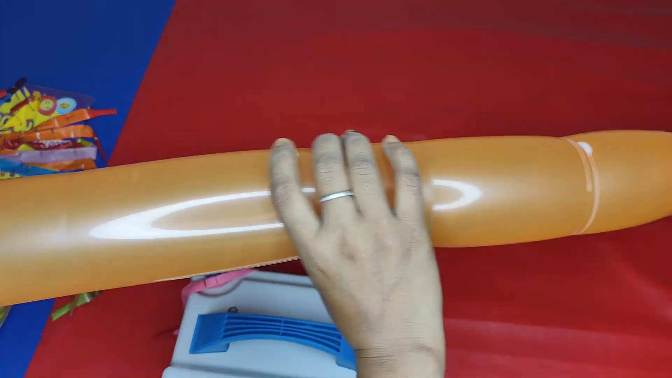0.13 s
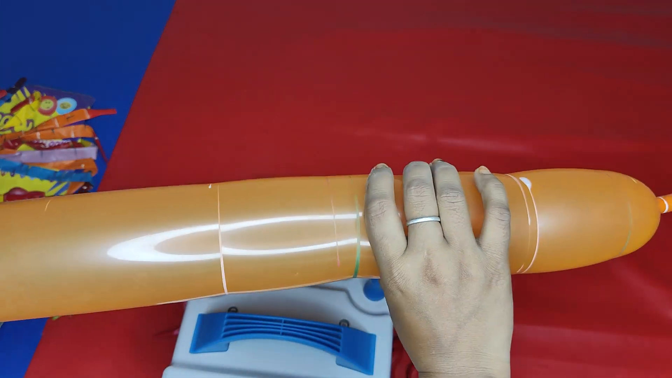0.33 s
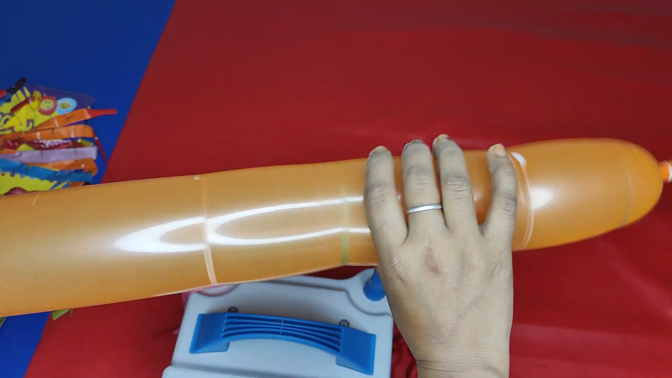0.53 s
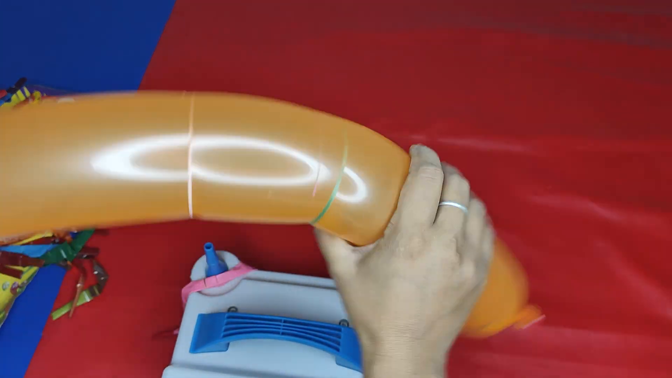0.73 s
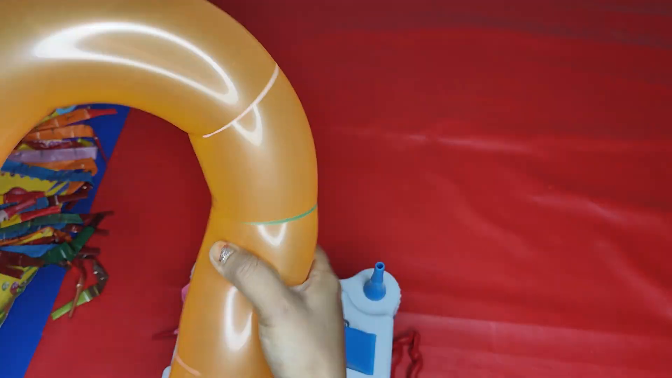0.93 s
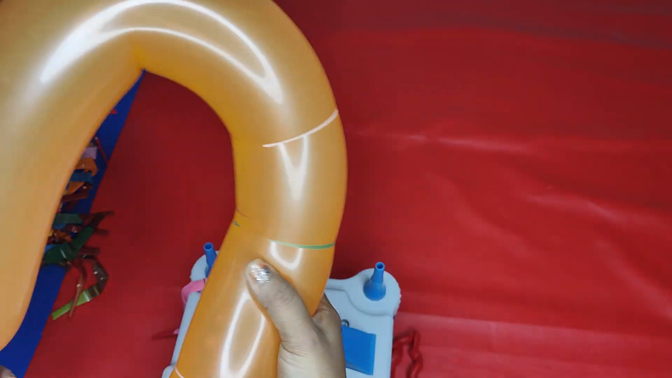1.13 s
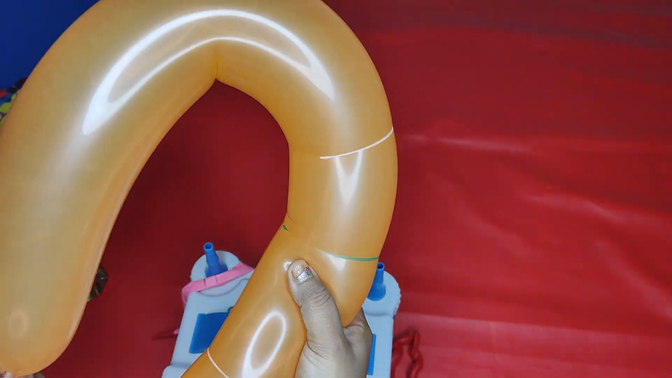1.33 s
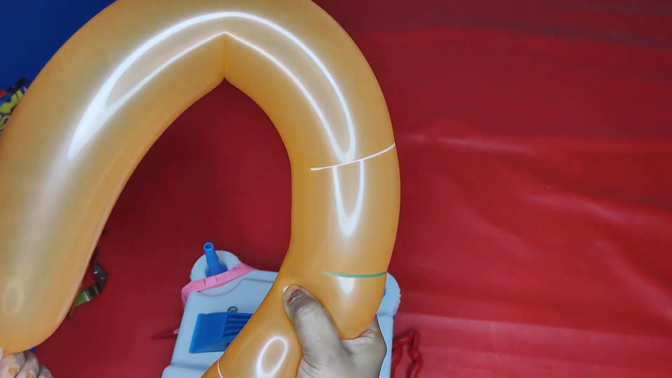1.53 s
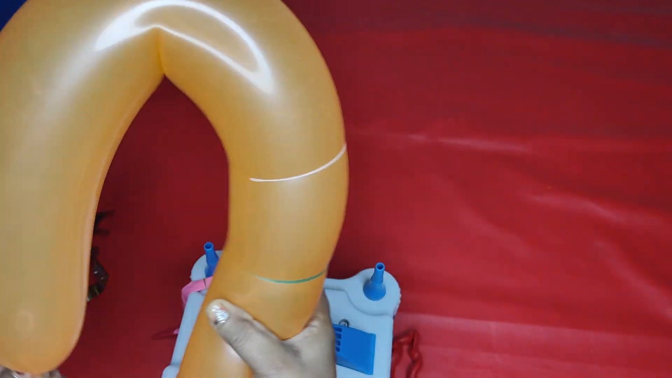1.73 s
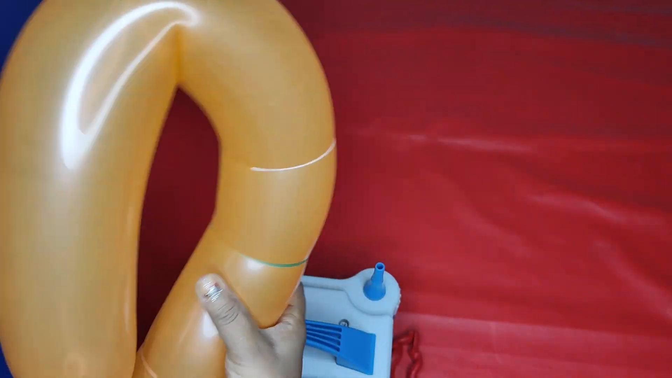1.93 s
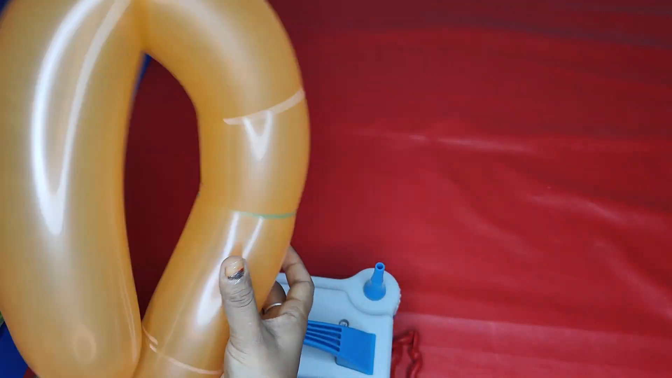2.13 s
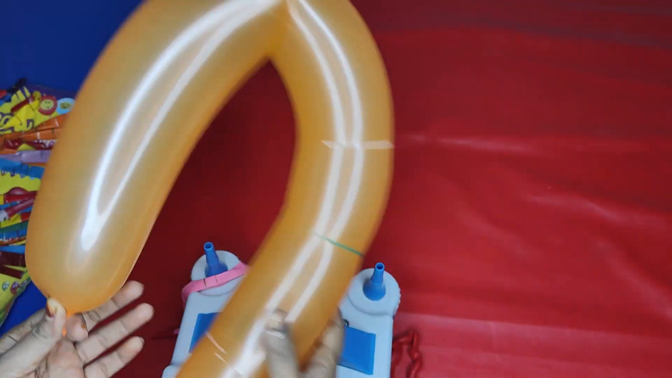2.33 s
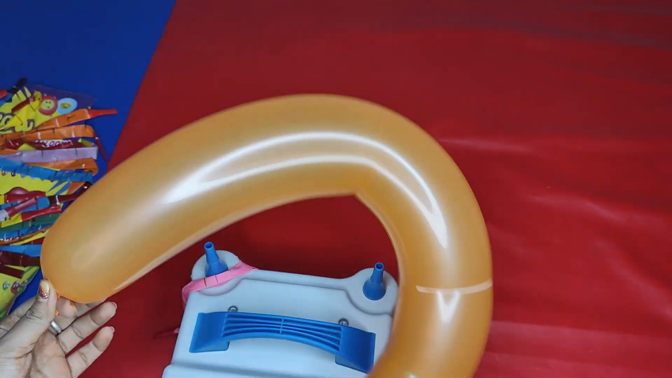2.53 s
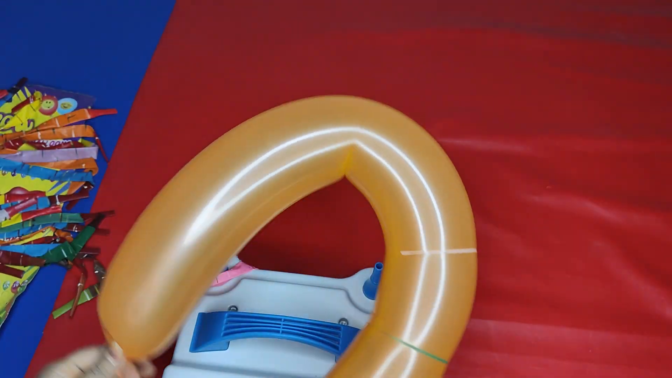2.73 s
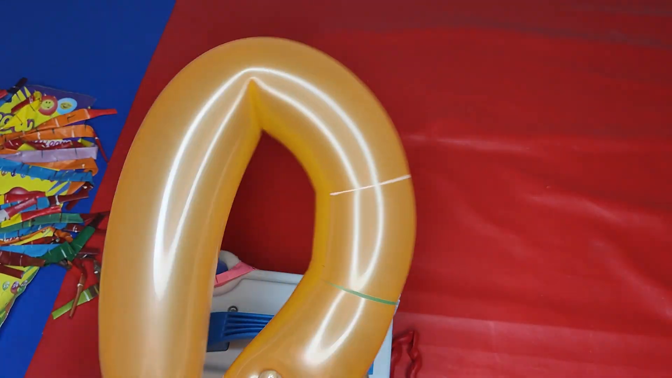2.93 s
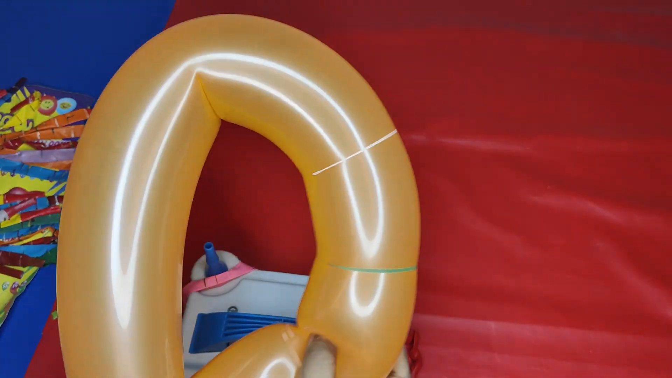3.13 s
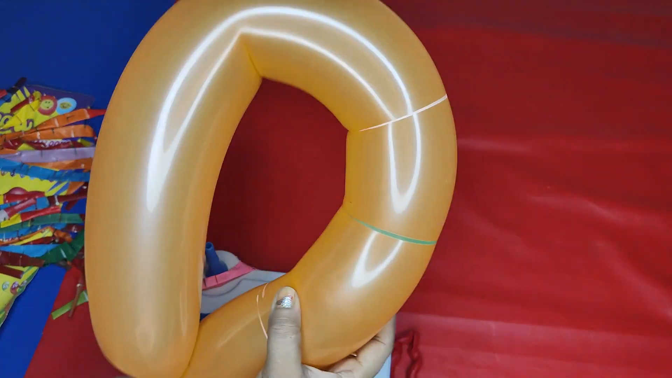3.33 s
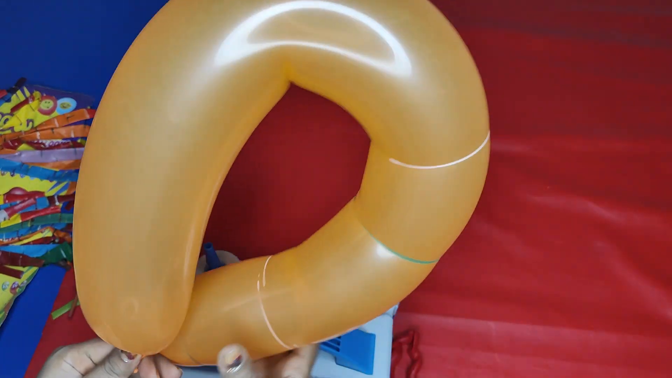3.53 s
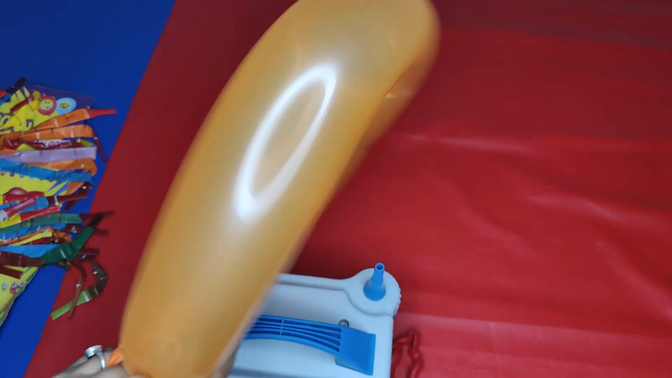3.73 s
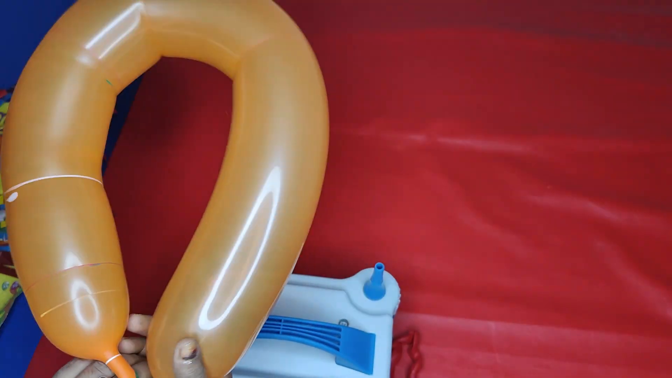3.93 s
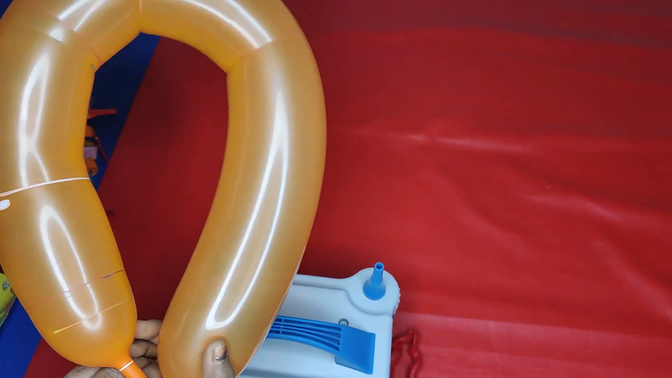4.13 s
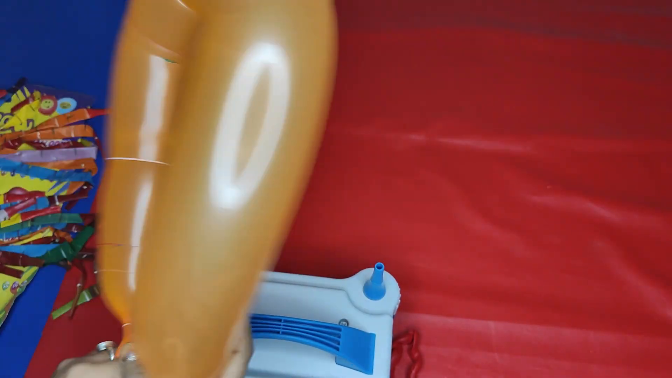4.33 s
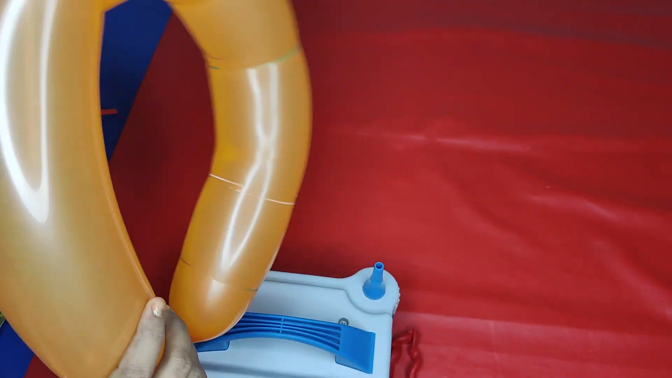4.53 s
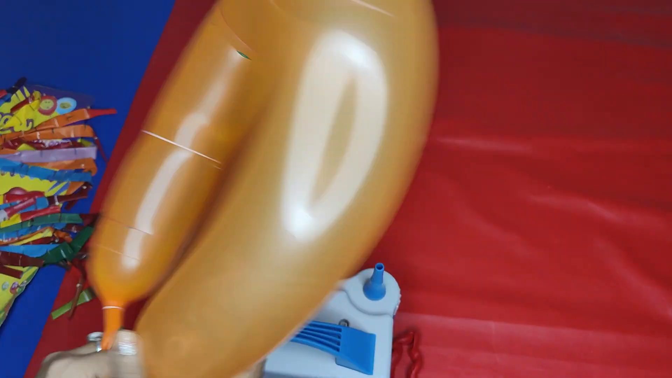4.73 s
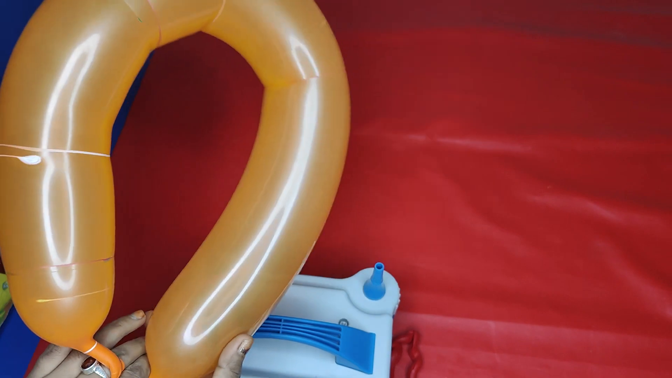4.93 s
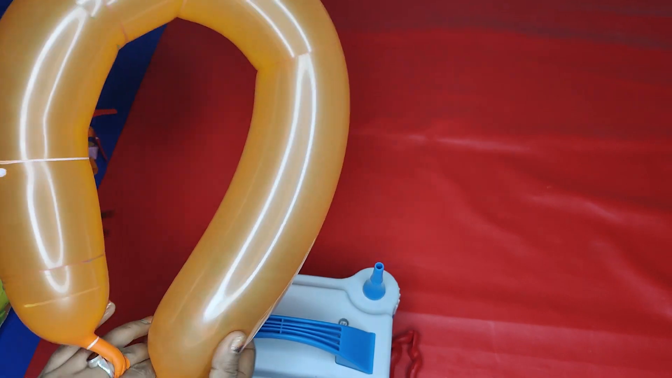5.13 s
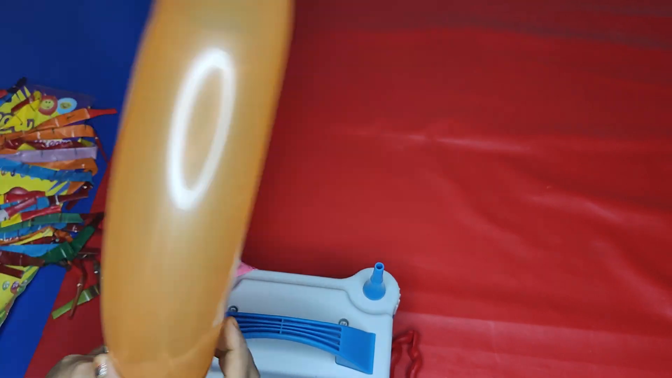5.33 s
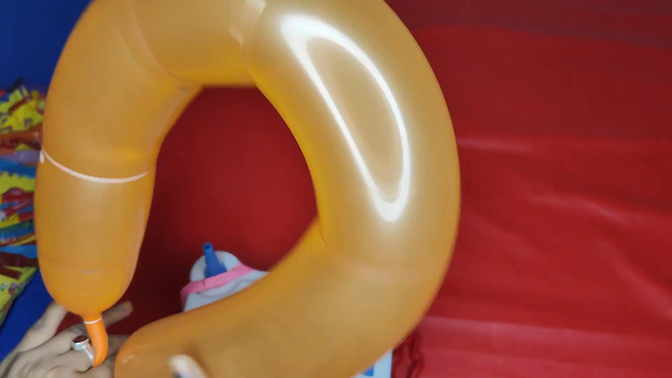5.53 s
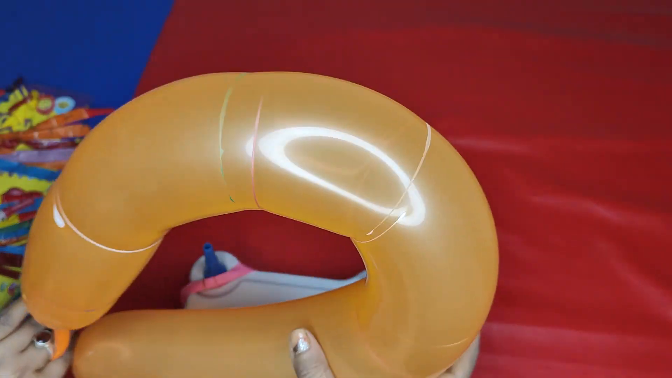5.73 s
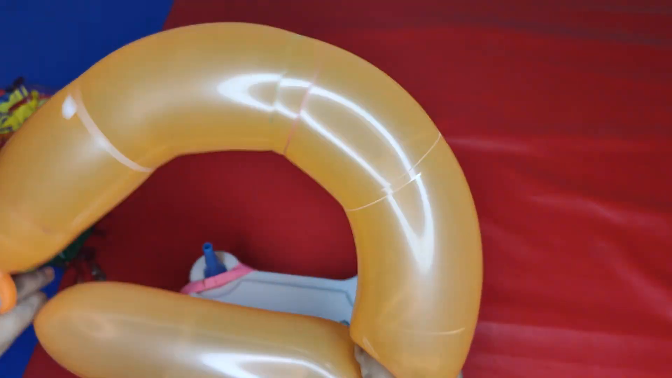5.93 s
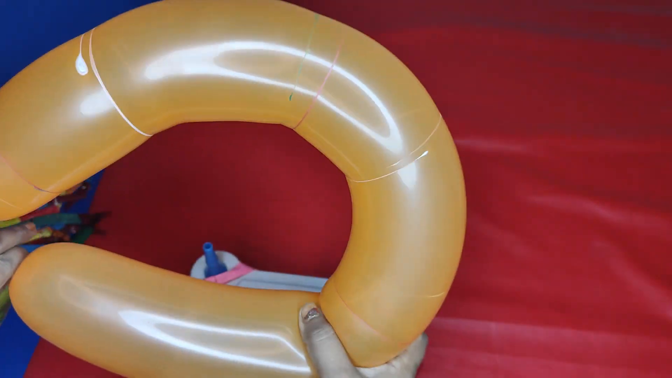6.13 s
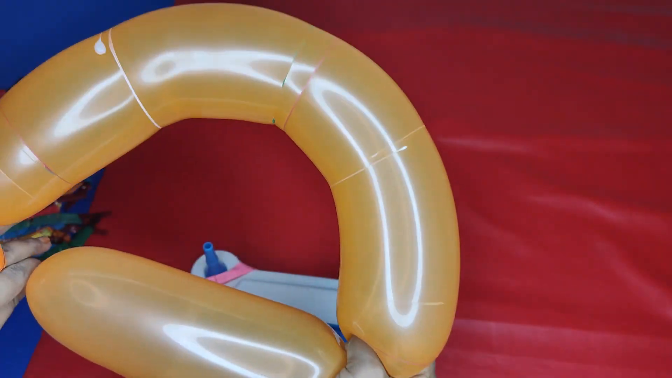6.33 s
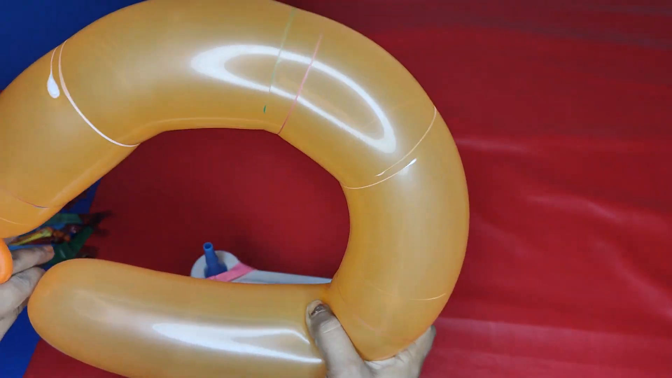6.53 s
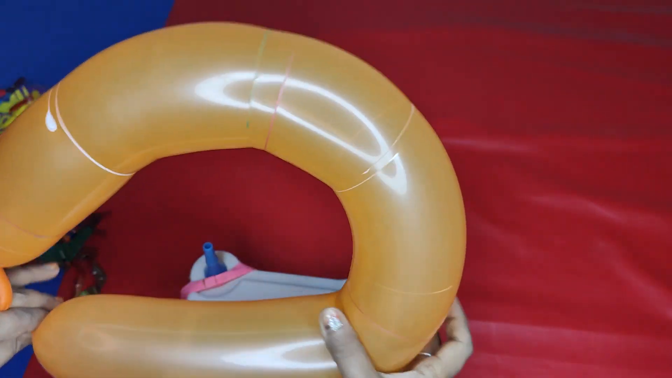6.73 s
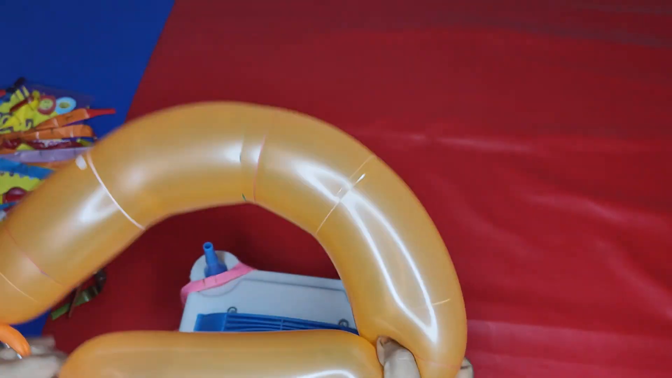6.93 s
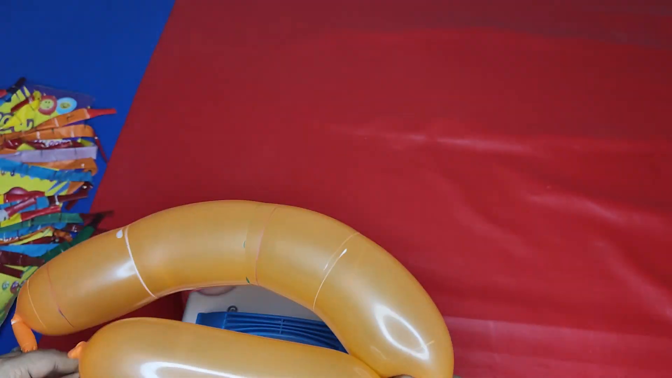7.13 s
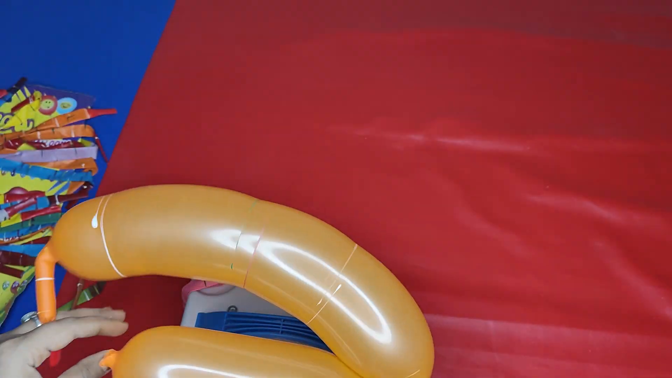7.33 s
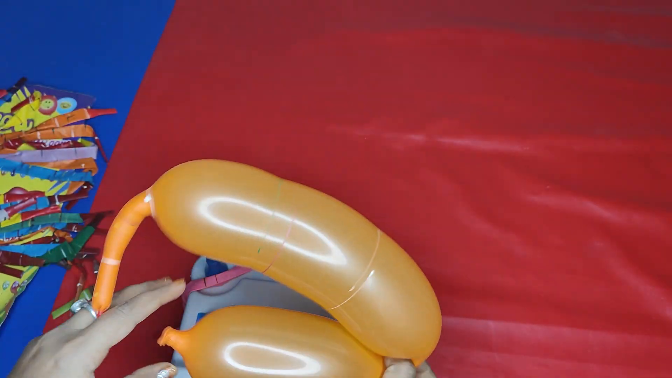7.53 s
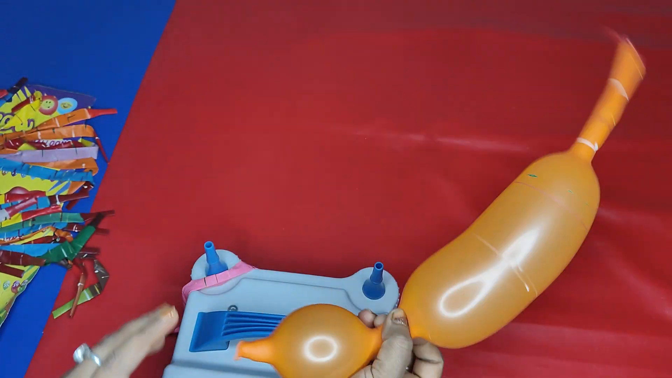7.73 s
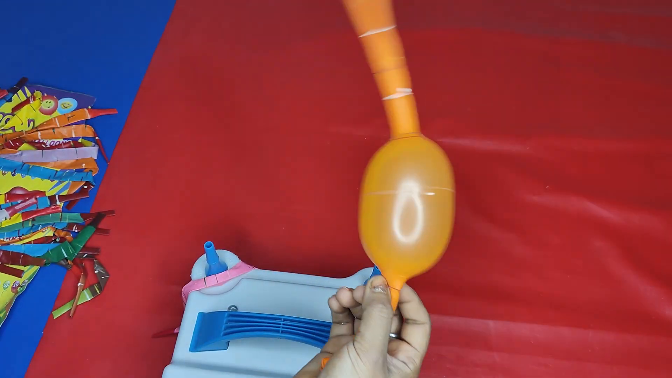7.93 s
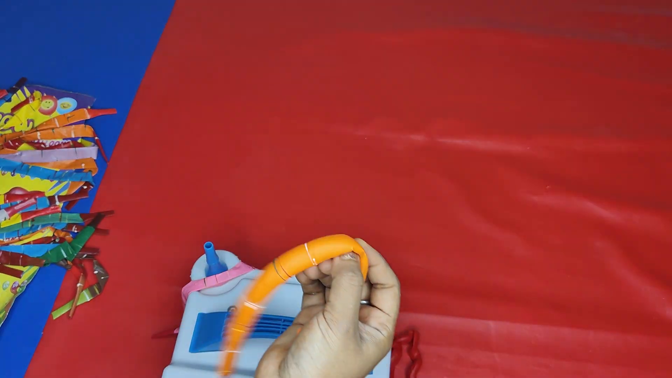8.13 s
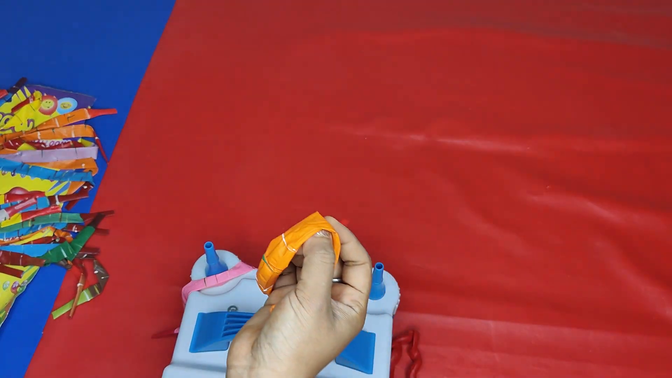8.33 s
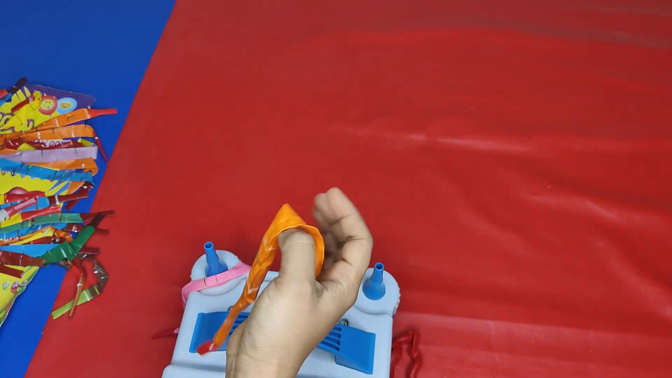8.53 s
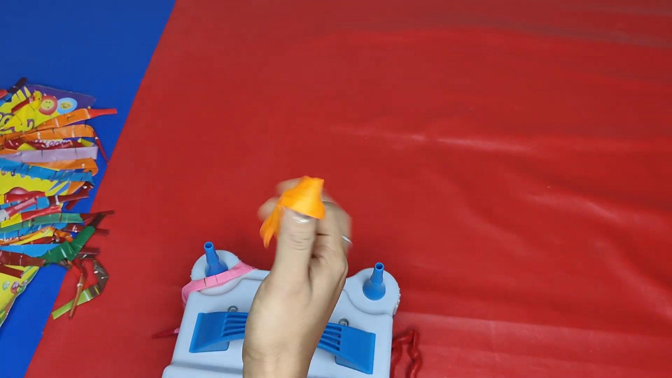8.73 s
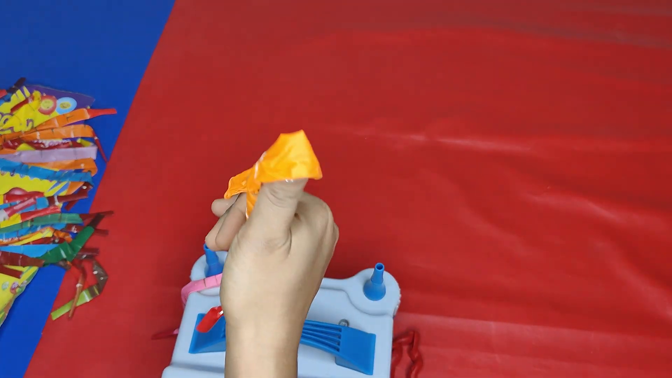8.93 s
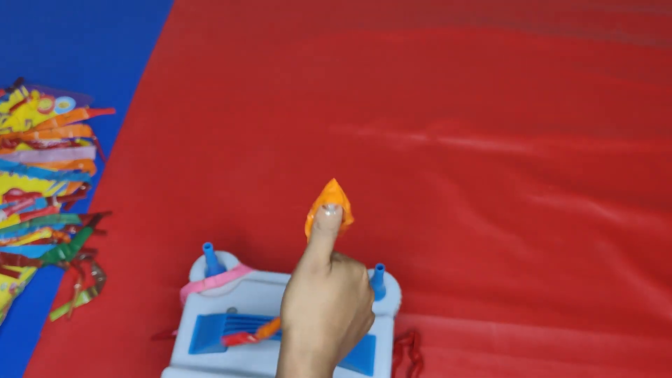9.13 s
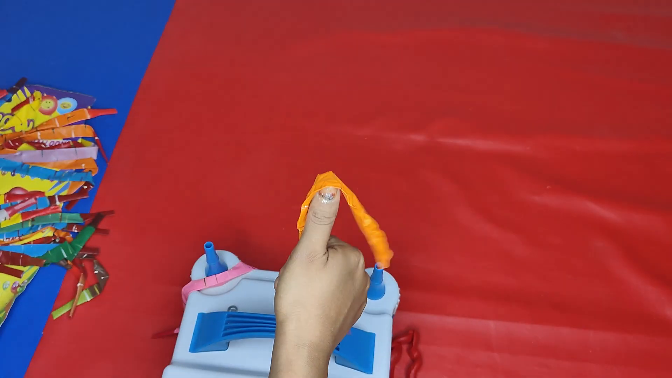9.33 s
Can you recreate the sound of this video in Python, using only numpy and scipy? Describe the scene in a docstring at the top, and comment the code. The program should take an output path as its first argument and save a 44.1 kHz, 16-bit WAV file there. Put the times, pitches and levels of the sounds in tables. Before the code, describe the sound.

A small electric pump whines down while hands creak, snap and rub a long balloon, which then gives way in a booming, fluttering rush of air.

```python
"""In a small room, an electric balloon pump coasts to a stop on a table while hands work a long balloon.
Pump: a falling sine whine with airy overtones, bearing noise and a shaft hum. Skin: stick-slip rasps ring
latex modes in two loud creaks; gliding sines chirp, dispersed clicks snap, hissing noise rubs.
The skin then gives way: sinking harmonics boom, and shaped noise and flapping puffs carry the air out
until the balloon hangs limp. A table echo, the walls' reverb and still room noise surround it all."""
import sys
import numpy as np
from scipy import signal
from scipy.fft import rfft, irfft, next_fast_len
from scipy.io import wavfile
from scipy.ndimage import map_coordinates

SR = 44100
rng = np.random.default_rng(int(sys.argv[2]) if len(sys.argv) > 2 else 0)


def file_out(sig):
    """Save sig as 16-bit WAV at sys.argv[1]."""
    # one column per channel
    cols = np.atleast_2d(sig).T
    # limit, then scale
    lim = np.clip(cols, -1, 1)
    pcm = np.round(lim * 32767).astype(np.int16)
    wavfile.write(sys.argv[1], SR, pcm)


N = 413658  # length in samples

# still room noise, relative spectrum: f/Hz, level/dB per Hz
QUIET_SPECTRUM = [(15, -46), (25, -7), (107, -13), (126, -10.5), (160, -8), (289, -15), (359, -4),
                  (433, -11.5), (1340, -15.5), (3170, -49.5), (5140, -36.5), (7100, -41.5), (15500, -49)]
# faint steady tone: f/Hz, level/dB
STEADY_TONES = [(5324, -87)]

# the fan coasts down against dry friction and air drag
FAN_START_HZ, FRICTION_HZ_PER_S, DRAG_PER_S = 2850, 405, .1
# whirr at full speed, and its loss towards standstill besides the square root of speed
WHIRR_DB, WHIRR_FALL_DB = -40.5, 26.5
# whirring bearings, relative spectrum: f/Hz, level/dB per Hz
WHIRR_SPECTRUM = [(40, -32), (110, -9.5), (190, 1.5), (380, -6.5), (600, -10), (1400, -9), (2300, -16.5),
                  (3100, -23.5), (4300, -16.5), (7000, -27.5), (10000, -26.5), (16000, -46.5)]
# housing resonances that swell the falling whine: f/Hz, width/Hz, level/dB
HOUSING_MODES = [(2235, 170, -47.5), (1920, 120, -53), (1691, 80, -48), (1330, 140, -51.5),
                 (1198, 55, -50.5)]
# swells of the shaft's hum: start t/s, fullest t/s, end t/s, level/dB
HUM_SWELLS = [(-.06, 0.248, .3, -37), (.64, 1.13, 1.48, -41)]

# fingers dragging on the skin, one list per drag: t/s, slip rate/per s, relative level/dB
FINGER_DRAGS = [
    [(.107, 125.5, -10), (.15, 118, -11), (.19, 115, -9.5), (.215, 128, -7.5), (.236, 200, -8.5),
     (.254, 163, -12)],
    [(.732, 195, -18.5), (.75, 184, -23.5), (.768, 230, -18), (.782, 260, -29)],
]
# single jerks of the skin: t/s, relative level/dB, pitch factor
SKIN_JERKS = [(.045, -16.5, 1), (.055, -23, 0.84), (.082, -16.5, 0.93), (.091, -15.5, 0.82),
              (.098, -19, 0.95), (.646, -29, 0.84), (.672, -29, .85), (.679, -7.5, 0.95),
              (.6855, -13, 0.93), (.692, -14, 0.79), (.702, -11, 0.9), (.728, -10, 0.85)]
# modes of the stretched latex at pitch factor 1: f/Hz, width/Hz, relative level/dB
SKIN_MODES = [(796, 157, -15), (1596, 360, -1.5), (2254, 228, 1.5), (2585, 180, -6), (5827, 400, -14.5),
              (8900, 800, -12.5)]
# slipping skin, relative spectrum: f/Hz, level/dB per Hz
RASP_SPECTRUM = [(40, -32), (110, -11), (220, -3.5), (420, -6.5), (650, -10), (1000, -0.5), (2400, -3),
                 (3200, -2), (5500, -6), (9500, -8.5), (15500, -19)]
# hoarse chirps of catching fingers: t/s, length/s, start f/Hz, end f/Hz, level/dB
SKIN_CHIRPS = [(.122, .17, 698, 1051, -36), (.679, 0.031, 601, 573, -24), (.735, .035, 518, 556, -34),
               (2.798, .14, 1740, 2240, -51), (3.198, 0.069, 678, 496, -49),
               (3.206, 0.057, 1007, 1124, -50.5), (3.58, 0.043, 620, 523, -49),
               (3.688, 0.038, 1204, 1120, -45), (3.788, 0.042, 2227, 2105, -47),
               (5.772, 0.085, 1247, 957, -55), (6.192, 0.038, 1003, 758, -53), (8.171, .1, 491.7, 587, -50),
               (8.243, 0.035, 2350, 2582, -29.5)]
# soft bumps of the balloon: t/s, level/dB, nominal f/Hz before the glide, length/s
SOFT_BUMPS = [(.70, -32, 205, 0.088), (0.744, -38, 59.4, 0.071), (3.9, -50, 81, 0.042),
              (3.952, -42.5, 58, 0.053), (4.852, -54, 90, 0.06), (4.984, -50, 141, 0.033),
              (5.56, -50, 180, .04), (5.603, -46.5, 60, 0.1), (7.135, -26.5, 366, 0.028)]

# flicks and snaps of the skin, and the pop of an air spurt at 7.94 s, relative levels:
# t/s, pop level/dB, edge level/dB, thump level/dB
SNAPS_AND_POP = [(1.1908, -28, -22, -49), (1.8943, -7, -18.5, -45), (2.649, -26, -30, -48),
                 (2.982, -24.5, -32, -19), (3.102, -17.5, -28.5, -18), (3.345, -17.5, -20.5, -40),
                 (3.551, -1, -20.5, -18), (4.008, -28, -26, -35), (4.843, -19.5, -22.5, -22.5),
                 (5.522, -28, -34.5, -16.5), (5.555, -40, -55, -18), (6.0149, -21.5, -14.5, -54),
                 (6.1525, -36.5, -31, -47), (6.177, -28, -20.5, -40), (6.5235, -36.5, -32.5, -58),
                 (6.5473, -21.5, -20, -41), (6.7127, -6, -13, -25), (6.8382, -15, -26, -16),
                 (6.8615, -12, -24.5, -21.5), (6.944, -22, -33, -27), (6.9783, -21, -29, -29),
                 (7.112, -7.5, -11, -27), (7.94, -20, -17, -18.5), (8.867, -54, -41, -58)]
# dull pop of a snap, relative spectrum: f/Hz, level/dB per Hz
POP_SPECTRUM = [(50, -16.5), (150, -6.5), (380, 6), (750, -0.5), (1300, 5), (2400, 4.5), (3200, -7.5),
                (6000, -15), (15000, -60)]
# sharp edge of a snap, relative spectrum: f/Hz, level/dB per Hz
EDGE_SPECTRUM = [(500, -49.5), (2500, -7.5), (4000, 3.5), (6500, 3.5), (10000, -8), (15500, -22.5)]
# thump of the air inside, relative spectrum: f/Hz, level/dB per Hz
THUMP_SPECTRUM = [(40, -6.5), (130, -4), (380, 2), (600, -9), (1200, -16), (4000, -48)]

# hands sliding on the skin, and a brief hiss of leaking air at 6.989 s:
# start t/s, length/s, hiss level/dB, drone level over the hiss/dB
STROKES_AND_LEAK = [(2.08, 0.41, -56, -5), (2.765, .19, -56.5, -7.5), (3.026, .12, -57, 2),
                    (3.158, .23, -49.5, -7.5), (3.386, .125, -50, -15), (3.548, .22, -52, -1),
                    (3.725, .23, -52, -3.5), (3.979, .04, -53.5, 1), (4.41, .23, -68.5, -1.5),
                    (4.824, .13, -55.5, -1), (4.924, .12, -58.5, -12), (5.296, .21, -69, -8),
                    (5.526, 0.38, -48.5, -9), (5.89, .13, -60.5, -6), (5.996, .09, -53, -7.5),
                    (6.154, .06, -51, -7.5), (6.308, .13, -63.5, -2), (6.499, .08, -59.5, -1),
                    (6.989, .06, -54.5, -15), (8.855, .08, -67.5, -17), (9.261, .11, -72, -17.5)]
STROKE_PEAK = 0.53  # share of its length at which each row is loudest
# dry rubbing and leak, relative spectrum: f/Hz, level/dB per Hz
HISS_SPECTRUM = [(800, -5), (2500, -3.5), (4000, -6.5), (6000, -0.5), (9000, -0.5), (12000, -7.5),
                 (15500, -19.5)]
# droning skin, relative spectrum: f/Hz, level/dB per Hz
DRONE_SPECTRUM = [(60, 4), (160, -14), (380, 0), (700, -2), (1200, 1), (2300, -2), (3100, -31),
                  (6000, -35.5)]

# the air's way out: it opens, narrows to the neck, and the balloon is empty
OPEN_S, NARROW_S, EMPTY_S = 7.045, 7.94, 8.27
# open jet; jet and neck resonance once it has narrowed
JET_DB, NARROW_JET_DB, NECK_DB = -38.5, -45, -35
# spurts break off as a pocket of air gets through: peak t/s, jet level/dB, flap level/dB, neck level/dB
AIR_SPURTS = [(7.142, -23.5, -30.5, -21.5), (7.942, -32, -47, -37.5), (8.071, -46, -50.5, -35),
              (8.266, -40.5, -42.5, -36)]
SPURT_RISE_S, SPURT_FALL_S = 0.027, .01  # time constants
# jet of air, relative spectrum: f/Hz, level/dB per Hz
JET_SPECTRUM = [(300, -25), (1500, -25.5), (3000, -4), (4800, -1), (8000, 1), (10500, 0.5), (12500, -3.5),
                (15500, -11.5)]
# flapping tube, relative spectrum: f/Hz, level/dB per Hz
FLAP_SPECTRUM = [(90, -17.5), (250, -4), (550, -3.5), (1000, -1), (1400, -1), (2300, -0.5), (3200, -11.5),
                 (7000, -34)]
# resonances of the narrow neck: f/Hz, width/Hz, relative level/dB
NECK_MODES = [(598, 85, -19.5), (1310, 250, -13.5), (2140, 260, 0.5), (2600, 310, 0.5), (4000, 1200, -6.5),
              (6560, 1800, -9.5), (8200, 980, -16.5)]

# the air column booms as the skin gives way, and its pitch sinks with the pressure
BOOM_S, BOOM_ATTACK_S, BOOM_HOLD_S, BOOM_RELEASE_S = 7.125, 0.029, 0.17, 0.057
BOOM_START_HZ, BOOM_END_HZ, BOOM_SINK_S = 123, 88.6, .11
BOOM_DB, BOOM_FADE_DB_PER_S = -32.5, 32
# harmonics of the boom: multiple of the fundamental, relative level/dB
BOOM_HARMONICS = [(1, -6), (2, -17), (3, -17), (4, -7.5), (5, -15.5)]

# the tube collapses: start, fullest flutter, heaviest flaps, end
SLACK_S, FLUTTER_S, HEAVY_S, LIMP_S = 7.48, 7.63, 7.79, 7.91
# nominal flap rate and resonances, each from start to end of the collapse
FLAPS_PER_S, MOUTH_HZ, POCKET_HZ = (135, 50), (1130, 895), (350, 224)
# the loudest flaps: t/s, relative level/dB
LOUD_FLAPS = [(7.689, -24), (7.756, -24), (7.783, -24.5), (7.791, -22), (7.808, -22.5), (7.844, -26.5)]

# decay of the room: f/Hz, time to fall 60 dB/s
ROOM_DECAY = [(100, 0.5), (500, .65), (2000, 0.5), (6000, 0.44), (10000, .48), (16000, 0.23)]
# likeness of diffuse sound at the two ports: f/Hz, likeness (0 to 1)
PORT_LIKENESS = [(30, 0.9), (100, 0.2), (280, 1), (550, 0.034), (1000, 0.074), (2000, .05), (4000, 0.0099)]
# colour of the left microphone port: f/Hz, level/dB
LEFT_COLOUR = [(100, 3), (700, 2.5), (2200, 2.5), (3200, 1.5), (4400, 7.5), (5300, 6.5), (6150, 14),
               (7000, -1.5), (8200, -21), (9500, -11), (11000, -4.5), (15000, 0.5)]
# colour of the right microphone port: f/Hz, level/dB
RIGHT_COLOUR = [(100, 2), (700, 1.5), (2200, 0.5), (3200, -0.5), (4400, 1), (5500, -5), (7000, -7.5),
                (8100, 6), (9500, 3), (11000, 1), (15000, 0.5)]
TOP_HZ = 15850  # nothing passes above this


def amp(db):
    """Decibels to amplitude."""
    return 10 ** (np.asarray(db) / 20)


def unit(x):
    """Scale to rms 1."""
    return x / np.sqrt(np.mean(x ** 2) + 1e-20)


def along(points, hz):
    """Read (f/Hz, value) points on a log frequency axis."""
    f, v = np.transpose(points)
    return np.interp(np.log(hz + 1), np.log(f), v)


def curves(rows):
    """One value per sample for each column after the time."""
    s, *cols = np.transpose(rows)
    return [np.interp(np.arange(N) / SR, s, c) for c in cols]


def wobble(rate):
    """A smooth random curve, rate knots a second."""
    knots = rng.standard_normal(int(N * rate / SR) + 4)
    return map_coordinates(knots, [np.arange(N) * rate / SR])


def swell(start, peak, end):
    """A rounded rise from 0 to 1 and back (times in s)."""
    return np.sin(np.pi / 2 * np.interp(np.arange(N) / SR, [start, peak, end], [0, 1, 0]))


def held(start, end, attack, release):
    """Rise from start, hold 1 until end, then release (all in s)."""
    t = np.arange(N) / SR
    return np.clip((t - start) / attack, 0, 1) * np.clip(1 - (t - end) / release, 0, 1)


def filtered(x, response):
    """x times a complex response of frequency, zero-padded against wrap-around."""
    m = next_fast_len(N + SR // 2)
    return irfft(rfft(x, m) * response(np.fft.rfftfreq(m, 1 / SR)), m)[..., :N]


def coloured(x, points):
    """x through a causal minimum-phase filter with the given (f/Hz, level/dB) gain."""
    size = 4096
    cepstrum = irfft(np.log(amp(along(points, np.fft.rfftfreq(size, 1 / SR)))))
    # fold the cepstrum forward in time
    cepstrum[1:size // 2] *= 2
    cepstrum[size // 2 + 1:] = 0
    impulse = irfft(np.exp(rfft(cepstrum)))
    return signal.oaconvolve(x, impulse)[:N]


def shaped(x, points):
    """As coloured, but white noise keeps its power."""
    gain = amp(along(points, np.fft.rfftfreq(2 ** 12, 1 / SR)))
    return coloured(x, points) / np.sqrt(np.mean(gain ** 2))


def noise(points):
    """Noise of rms about 1 with the given spectrum."""
    return shaped(rng.standard_normal(N), points)


def add(track, s, sound):
    """Mix a sound into a track at time s."""
    part = track[max(round(s * SR), 0):][:len(sound)]
    part += sound[:len(part)]


def burst(life):
    """A puff of noise that rises quickly and dies within a few lives (s)."""
    u = np.arange(SR // 25) / SR / life
    puff = rng.standard_normal(len(u)) * np.sqrt(u) * np.exp(-u)
    return puff / np.linalg.norm(puff) * np.sqrt(life * SR)


def click(spread, grit):
    """A click smeared in time, treble first (spread: delay at 1 kHz in s), with some grit."""
    size = 2048
    khz = np.fft.rfftfreq(size, 1 / SR) / 10 ** 3
    # delay falls with the square root of frequency
    clean = irfft(np.exp(-4j * np.pi * spread * 10 ** 3 * np.sqrt(khz)))[:size // 2]
    rough = burst(.0016)[:size // 2]
    return clean + grit * rough / np.linalg.norm(rough)


def diffuse(pair):
    """Blend two unrelated signals so that they are as alike at each frequency as at two close ports."""
    def response(hz):
        angle = np.arccos(np.clip(along(PORT_LIKENESS, hz), -1, 1)) / 2
        return np.array([np.cos(angle), np.sin(angle)])

    mid, side = filtered(pair, response)
    return np.array([mid + side, mid - side])


def background():
    """Still room noise, diffuse at the two ports, with a faint steady sine."""
    t = np.arange(N) / SR
    tones = sum(amp(db) * np.sin(2 * np.pi * hz * t) for hz, db in STEADY_TONES)
    hush = diffuse(np.array([noise(QUIET_SPECTRUM), noise(QUIET_SPECTRUM)]))
    return amp(-64.5) * hush + tones


def pump(blades=24, blur_hz=2.5, air_blur_hz=130):
    """The coasting motor: shaft hum, a falling fan whine with airy overtones, and whirring bearings."""
    t = np.arange(N) / SR
    brake_hz = FRICTION_HZ_PER_S / DRAG_PER_S
    whine_hz = np.maximum((FAN_START_HZ + brake_hz) * np.exp(-DRAG_PER_S * t) - brake_hz, 0)
    speed = whine_hz / FAN_START_HZ
    whine_phase = 2 * np.pi * np.cumsum(whine_hz) / SR
    shaft = np.sin(whine_phase / blades)

    def stray(hz, rate):
        """Random drift of phase that blurs a tone."""
        return 2 * np.pi * np.cumsum(hz * wobble(rate)) / SR

    housing = sum(amp(db) / (1 + (2 * (whine_hz - hz) / width) ** 2) for hz, width, db in HOUSING_MODES)
    whine = housing * amp(.7 * wobble(30)) * np.sin(whine_phase + stray(blur_hz, 120))
    airy = sum(amp(db) * np.sin(order * whine_phase + stray(air_blur_hz, 900))
               for order, db in [(2, -11.5), (3, -16), (5, -24)])
    bearings = noise(WHIRR_SPECTRUM) * (1 + 0.38 * shaft)  # pulsing once a turn
    whirr_level = amp(WHIRR_DB - WHIRR_FALL_DB * (1 - speed)) * np.sqrt(speed)
    hum_level = sum(amp(db) * swell(start, fullest, end) for start, fullest, end, db in HUM_SWELLS)
    return whine + whirr_level * (bearings + airy), hum_level * shaft


def creaks(slip_time=0.0088, ring_db=11.0, rasp_db=-9, rise=0.0016, jitter=.02):
    """Skin sticks and slips under the fingers; each slip rasps briefly and rings the stretched latex."""
    slips = list(SKIN_JERKS)
    for drag in FINGER_DRAGS:
        rate, db = curves(drag)
        at = drag[0][0]
        while at < drag[-1][0]:
            now = int(at * SR)
            slips.append((at, db[now], 1))
            at += (1 + jitter * rng.normal()) / rate[now]
    ring, rasp = np.zeros(N), np.zeros(N)
    t = np.arange(SR // 25) / SR
    sliding = np.sqrt(np.clip(1 - t / slip_time, 0, 1))
    for s, db, pitch in slips:
        tension = pitch * (1 + 0.026 * rng.normal())
        modes = np.zeros(len(t))
        for hz, width, level in SKIN_MODES:
            decay = amp(level + rng.normal()) * np.exp(-np.pi * width * t)
            modes += decay * np.sin(2 * np.pi * (hz * tension * t + rng.random()))
        add(ring, s, amp(db + ring_db) * modes * (1 - np.exp(-t / rise)))
        add(rasp, s, amp(db + rasp_db) * sliding * rng.standard_normal(len(t)))
    return ring + shaped(rasp, RASP_SPECTRUM)


def chirps(hoarse=.11):
    """Fingers catch on the latex: uneven slips excite one gliding resonance, a roughened sine."""
    out, waver, grain = np.zeros(N), wobble(500), amp(3.8 * wobble(250))
    for s, length, start_hz, end_hz, db in SKIN_CHIRPS:
        u = np.linspace(0, 1, int(length * SR))
        glide_hz = start_hz + (end_hz - start_hz) * u
        hz = glide_hz * (1 + hoarse * waver[int(s * SR):][:len(u)])
        add(out, s, amp(db) * np.sin(np.pi * u) * np.sin(2 * np.pi * np.cumsum(hz) / SR))
    return out * grain


def bumps():
    """The soft tube swings against hand and table: a short, sagging sine each time."""
    out = np.zeros(N)
    for s, db, hz, length in SOFT_BUMPS:
        t = np.arange(int(length * SR)) / SR
        sag = 1.1 - 0.206 * t / length
        tone = np.sin(2 * np.pi * np.cumsum(hz * sag) / SR)
        add(out, s, amp(db) * np.sin(np.pi * t / length) * tone)
    return out


def snaps_and_pop(spread=0.000812, grit=0.78):
    """Taut skin springs off a fingertip, and once an air spurt pops: dull pop, sharp edge, air thump."""
    pop, edge, thump = np.zeros((3, N))
    for s, pop_db, edge_db, thump_db in SNAPS_AND_POP:
        add(pop, s, amp(pop_db) * click(spread, grit))
        add(edge, s, amp(edge_db) * click(spread, grit))
        add(thump, s, amp(thump_db) * click(spread, grit))
    return shaped(pop, POP_SPECTRUM) + shaped(edge, EDGE_SPECTRUM) + shaped(thump, THUMP_SPECTRUM)


def rubbing_and_leak(grain_db=2, catch_db=2.5):
    """Dry hands hiss over the latex in fine grains and the skin drones; one brief leak hisses alike."""
    hiss, drone = np.zeros((2, N))
    for start, length, db, drone_db in STROKES_AND_LEAK:
        level = amp(db) * swell(start, start + STROKE_PEAK * length, start + length)
        hiss += level
        drone += amp(drone_db) * level
    skin_drone = drone * noise(DRONE_SPECTRUM) * amp(catch_db * wobble(60))
    return amp(grain_db * wobble(350)) * (hiss * noise(HISS_SPECTRUM) + skin_drone)


def escaping_air(flutter_db=4.0, slack_db=-38, flap_rest_db=-53, push_db=5.0,
                 opening=.05, narrowing=0.033, closing=.01, neck_waver_db=1.8):
    """The collapsing tube pushes a hissing jet and flaps in it; the last air resonates in the neck."""
    t = np.arange(N) / SR
    wide = held(OPEN_S, NARROW_S, opening, narrowing)
    narrow = held(NARROW_S - closing, EMPTY_S, closing, closing)
    slack = swell(SLACK_S, FLUTTER_S, LIMP_S)
    jet = amp(JET_DB + push_db * slack) * wide + amp(NARROW_JET_DB) * narrow
    flap = amp(slack_db) * slack * np.interp(t, [FLUTTER_S, HEAVY_S], [1, .2])
    flap += amp(flap_rest_db) * (wide + narrow)
    neck = amp(NECK_DB) * narrow
    for s, jet_db, flap_db, neck_db in AIR_SPURTS:
        spurt = np.exp(-np.maximum((s - t) / SPURT_RISE_S, (t - s) / SPURT_FALL_S))
        jet += amp(jet_db) * spurt
        flap += amp(flap_db) * spurt
        neck += amp(neck_db) * spurt

    def pipe(f):
        """Neck resonances, neighbours in opposite phase."""
        return sum((-1) ** k * amp(db) * 1j * f * width / (hz * hz - f * f + 1j * f * width)
                   for k, (hz, width, db) in enumerate(NECK_MODES))

    jet_sound = jet * amp(0.81 * wobble(60)) * noise(JET_SPECTRUM)
    flap_sound = flap * amp(flutter_db * wobble(220)) * noise(FLAP_SPECTRUM)
    neck_noise = unit(filtered(rng.standard_normal(N), pipe))
    return jet_sound + flap_sound + neck * amp(neck_waver_db * wobble(150)) * neck_noise


def boom():
    """The air column of the long tube rings in harmonics and sinks as the pressure drops."""
    age = np.maximum(np.arange(N) / SR - BOOM_S, 0)
    hz = BOOM_END_HZ + (BOOM_START_HZ - BOOM_END_HZ) * np.exp(-age / BOOM_SINK_S)
    release_s = BOOM_S + BOOM_ATTACK_S + BOOM_HOLD_S
    level = amp(BOOM_DB - BOOM_FADE_DB_PER_S * age)
    level = level * held(BOOM_S, release_s, BOOM_ATTACK_S, BOOM_RELEASE_S)
    phase = 2 * np.pi * np.cumsum(hz * (1 + 0.011 * wobble(70))) / SR
    return level * sum(amp(db + 1.5 * wobble(25)) * np.sin(round(k) * phase) for k, db in BOOM_HARMONICS)


def blurts(mouth_width_hz=130, pocket_width_hz=45, pocket_db=-10, flap_db=-31, ends_db=-14, puff_db=-6):
    """Each irregular flap lets out a puff and rings the rubber mouth and the air pocket behind it."""
    def sagging(s, ends):
        return np.interp(s, [SLACK_S, LIMP_S], ends)

    flaps, at = list(LOUD_FLAPS), SLACK_S
    while at < LIMP_S:
        lightness = np.interp(at, [SLACK_S, HEAVY_S, LIMP_S], [1, 0, 1])
        flaps.append((at, flap_db + ends_db * lightness + rng.normal(0, 1.8)))
        at += rng.uniform(.5, 1.5) / sagging(at, FLAPS_PER_S)
    tone, puffs = np.zeros((2, N))
    t = np.arange(SR // 25) / SR

    def ring(hz, width):
        return np.exp(-np.pi * width * t) * np.sin(2 * np.pi * hz * t) * (1 - np.exp(-t / 0.00076))

    for s, db in flaps:
        mouth = ring(sagging(s, MOUTH_HZ) * (1 + 0.15 * rng.normal()), mouth_width_hz)
        pocket = ring(sagging(s, POCKET_HZ), pocket_width_hz)
        add(tone, s, amp(db) * (mouth + amp(pocket_db) * pocket))
        add(puffs, s, amp(db + puff_db) * burst(0.0013))
    return tone + shaped(puffs, FLAP_SPECTRUM)


def room(x, gap=.004):
    """Bare walls answer after a gap (s): a noise tail in which each frequency dies at its own speed."""
    hz, t, z = signal.stft(rng.standard_normal((2, SR)), SR, nperseg=256)
    decay = amp(-60 * t / along(ROOM_DECAY, hz)[:, None])
    tail = signal.istft(z * decay, SR, nperseg=256)[1]
    tail = np.pad(tail / np.linalg.norm(tail[0]), ((0, 0), (int(gap * SR), 0)))
    return diffuse(signal.fftconvolve(x[None], tail, axes=1)[:, :N])


def placed(x, lead_ms):
    """A close source reaches the left port a little earlier, half the lead shifted on each side."""
    sides = np.array([[1], [-1]])
    return filtered(x, lambda hz: np.exp(1j * np.pi * hz * lead_ms / 10 ** 3 * sides))


def swaying(x, lead_ms, sway_ms):
    """The balloon swings about in front of the ports, so the left one's lead keeps changing."""
    half = (lead_ms + sway_ms * wobble(4)) * SR / 10 ** 3 / 2  # in samples
    return np.array([map_coordinates(x, [np.arange(N) + side * half]) for side in (1, -1)])


def scene(wet_db=-4, rub_wet_db=-1, air_wet_db=-6, pump_wet_db=-2, table_delay=.0055, table_db=-13):
    """Hands and balloon are close; the table returns a first echo (delay in s), then the room answers."""
    whirr, hum = pump()
    snappy = creaks() + snaps_and_pop() + chirps()
    hissing = rubbing_and_leak()
    air = escaping_air() + blurts()
    table = amp(table_db) * np.pad(snappy, (int(table_delay * SR), 0))[:N]
    direct = swaying(snappy, lead_ms=0.091, sway_ms=.05)
    direct += swaying(hissing + air, lead_ms=0.15, sway_ms=0.04)
    direct += placed(table + whirr, lead_ms=.1)
    to_walls = amp(wet_db) * snappy + amp(rub_wet_db) * hissing + amp(air_wet_db) * air
    walls = room(to_walls + amp(pump_wet_db) * whirr)
    lows = placed(hum + bumps() + boom(), lead_ms=0.76)
    return direct + walls + lows + background()


def record(dry):
    """Each port has its own resonance; peaks are rounded off and the top is cut."""
    ports = np.array([coloured(dry[0], LEFT_COLOUR), coloured(dry[1], RIGHT_COLOUR)])
    rounded = ports / (1 + ports ** 6) ** (1 / 6)
    return filtered(rounded, lambda hz: hz < TOP_HZ)


dry = scene()
out = record(dry)
file_out(out)
```